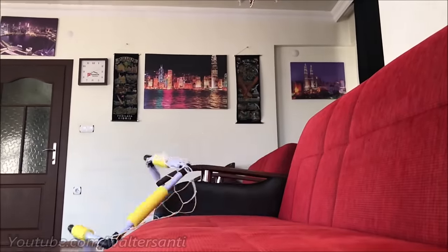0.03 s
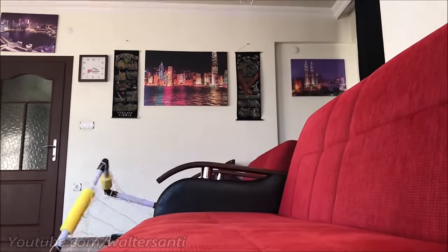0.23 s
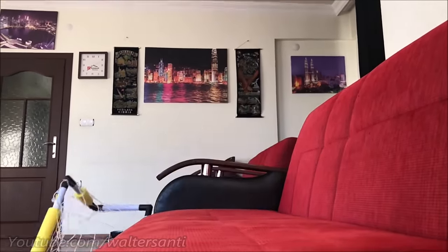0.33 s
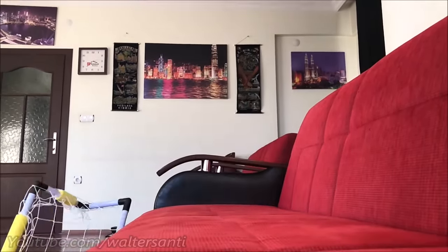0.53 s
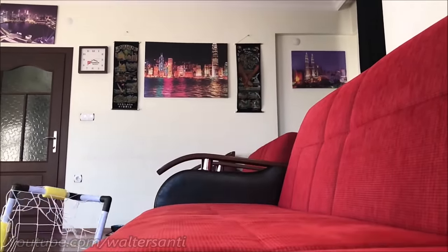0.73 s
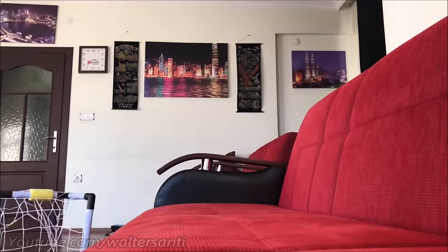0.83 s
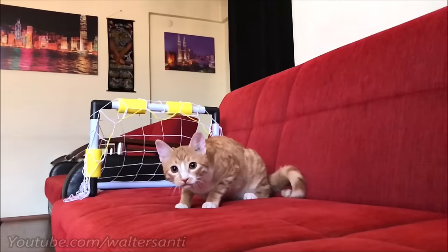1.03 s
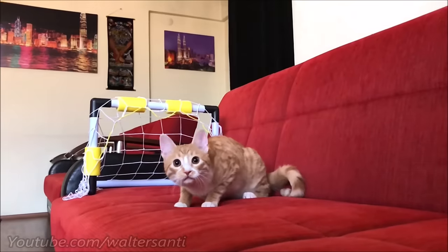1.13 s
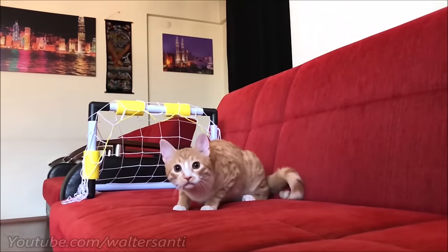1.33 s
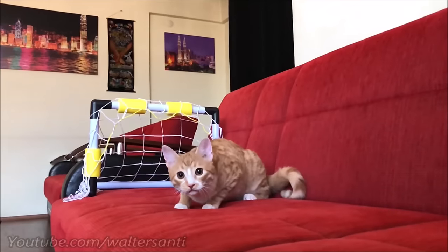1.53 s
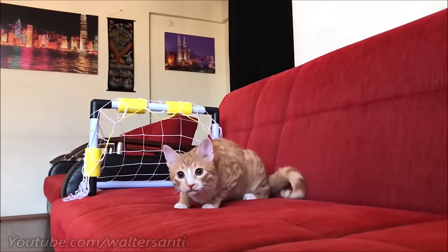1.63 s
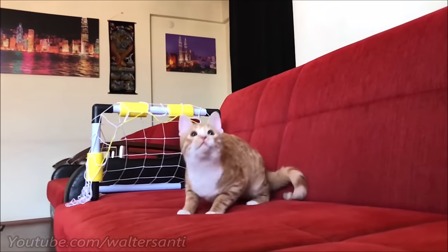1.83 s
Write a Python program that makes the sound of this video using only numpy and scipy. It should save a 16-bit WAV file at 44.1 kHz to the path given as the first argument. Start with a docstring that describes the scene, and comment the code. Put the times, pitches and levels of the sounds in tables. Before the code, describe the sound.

Loud hollow clatter of a light plastic toy tumbling off a sofa onto the floor.

```python
"""A toy goal of hollow plastic tubes tips off a sofa with soft bumps, hits the floor, bounces twice
and rattles to rest. The bare walls of a living room throw each blow back, and the loudest blows
clip. The sound cuts off just after one second; the quiet room fades in, with faint thin
whistles like distant birds and one tiny tick."""
import sys
import numpy as np
from scipy import signal
from scipy.fft import rfft, irfft
from scipy.io import wavfile
from scipy.ndimage import uniform_filter1d

SR = 44100
rng = np.random.default_rng(int(sys.argv[2]) if len(sys.argv) > 2 else 0)


def wrap_up_sound(samples):
    """Save the sound to the file named by the first command line argument, as 16-bit audio."""
    columns = np.atleast_2d(samples).T
    # keep every value between -1 and 1, then stretch to whole-number steps
    tamed = np.clip(columns, -1, 1)
    steps = np.round(tamed * 32767).astype(np.int16)
    wavfile.write(sys.argv[1], SR, steps)


N = 83790
SIZE = 2 ** 15  # samples per ring or room response

# spectrum of a light click (frequency [Hz], level [dB])
TICK_SPECTRUM = [(100, -29.5), (1500, -13), (3200, -13.5), (3900, 6), (6000, 0), (10000, -8.5),
                 (15000, -17)]


def floor_blows(treble_hz=3000, lag_at_1khz_s=0.0022):
    """Each blow, or bright slap just after the first, cracks, knocks and rings; lows trail highs."""
    # (time [s], level [dB], knock pitch [Hz], knock [dB], treble shelf [dB], direct path [dB])
    blows = [(0.2294, -6.5, 587, 3, -10, 6.5), (0.2400, -6, 622.4, -4.5, 9.5, 5),
             (0.262, -9.5, 630, -9.5, 5, -29), (0.4692, -8, 678, 6.5, -1, -0.5),
             (0.644, -14.5, 707, 2.5, 4, -2.5), (0.7522, -18, 699, 2.5, -3.5, -4.5),
             (0.812, -27, 570, -1.5, -6.5, -12)]
    # hard contact (frequency [Hz], level [dB])
    crack_spectrum = [(40, -34.5), (100, -24), (175, 3), (380, -7), (900, -1.5), (1450, 3.5), (2500, -7),
                      (4300, -8.5), (8000, -21.5), (15000, -29)]
    hz, out = freqs(), np.zeros(N)
    dispersion = np.exp(-4j * np.pi * lag_at_1khz_s * np.sqrt(1000 * hz))  # bending waves
    shelf = hz ** 2 / (hz ** 2 + treble_hz ** 2)
    for time_s, db, knock_hz, knock_db, treble_db, direct_db in blows:
        knock = undb(1 + knock_db) * tube_knock(knock_hz)
        ring = undb(-4.5) * frame_ring()
        crack = undb(3.5) * burst(crack_spectrum, t60_s=0.015)
        hit = colour(crack + knock + ring, treble_db * shelf)
        hit = irfft(rfft(hit, 2 * SIZE) * dispersion)[:SIZE]
        out += undb(db) * place(in_room(hit, direct_db), time_s)
    return out


def tube_knock(hz, rise_s=0.00051, t60_s=0.02):
    """Hollow knock with a soft onset, rising over about half a millisecond."""
    t = np.arange(SIZE) / SR
    swell = 1 - np.exp(-t / rise_s)
    return unit_energy(np.sin(2 * np.pi * hz * t) * swell * decay(t60_s))


def frame_ring(detune=0.017):
    """Damped modes; each contact detunes them and sets their signs at random."""
    # frame modes (frequency [Hz], level [dB], t60 [s])
    modes = [(528.7, -1.5, 0.51), (591, -0.5, 0.18), (644, -6.5, .2), (716.5, -1.5, 0.091), (877, -8, 0.11),
             (1134.3, -9, 0.086), (1352, -6, .18), (1442, -16, 0.25), (1695, -14, 0.09),
             (1962, -15.5, 0.16), (2630, -21, .1), (3050, -20, .08), (3880, -18.5, .08)]
    t, ring = np.arange(SIZE) / SR, np.zeros(SIZE)
    for hz, db, t60_s in modes:
        shift, side = rng.standard_normal(2)
        tone = np.sin(2 * np.pi * hz * (1 + detune * shift) * t)
        ring += np.sign(side) * undb(db) * unit_energy(tone * decay(t60_s))
    return ring


def sofa_bumps():
    """Soft thuds against the upholstery."""
    # (time [s], level [dB])
    bumps = [(0.001, -17.5), (0.112, -24.5), (0.86, -18), (1.021, -26), (1.050, -23.5)]
    # soft contact (frequency [Hz], level [dB])
    thud_spectrum = [(40, -7.5), (120, -12), (250, -10.5), (450, -0.5), (650, -5), (1000, -23),
                     (2000, -28.5), (5000, -35.5), (15000, -60)]
    return sum(undb(db) * place(burst(thud_spectrum, t60_s=0.053), time_s) for time_s, db in bumps)


def joint_clicks():
    """Light clicks of the frame's joints."""
    # (time [s], level [dB])
    clicks = [(0.003, -41.5), (0.1311, -27), (0.1536, -35), (0.4887, -18), (0.6631, -24), (0.773, -33),
              (0.831, -36.5), (1.0513, -57.5), (1.0654, -45.5)]
    return sum(undb(db) * place(burst(TICK_SPECTRUM, t60_s=0.017), time_s) for time_s, db in clicks)


def in_room(x, direct_db):
    """Direct path, wall reflections smeared by furniture, diffuse tail."""
    # first reflections (delay [s], level [dB])
    echoes = [(0.01, -6), (.0148, -9), (0.0191, -5.5), (0.028, -7)]
    response = np.zeros(SIZE)
    response[0] = undb(direct_db)
    for delay_s, db in echoes:
        smear = unit_energy(rng.standard_normal(SIZE) * decay(t60_s=0.012))
        response += undb(db) * place(smear, delay_s, size=SIZE)
    return convolve(x, response + undb(2.5) * room_tail())


def room_tail(delay_s=0.004, build_s=0.0084):
    """Diffuse reverberation that builds quickly and loses its treble first."""
    # room decay (frequency [Hz], t60 [s])
    bands = [(100, 0.54), (300, 1), (700, 0.47), (1500, 0.55), (4000, 0.53), (8000, 0.39), (15000, 0.25)]
    centres_hz, t60s = np.array(bands).T
    spectrum, hz = rfft(rng.standard_normal(SIZE)), freqs(SIZE // 2)
    tail = np.zeros(SIZE)
    for t60_s, weights in zip(t60s, np.eye(len(bands))):
        band_gain = log_interp(list(zip(centres_hz, weights)), hz)
        tail += irfft(spectrum * band_gain) * decay(t60_s)
    build = 1 - np.exp(-np.arange(SIZE) / SR / build_s)
    return unit_energy(place(tail * build, delay_s, size=SIZE))


def whistles(tail, arch=0.053, waver_depth=0.014, wet_db=-3):
    """Faint arched, wavering whistles that linger in the room."""
    # (time [s], length [s], top pitch [Hz], level [dB])
    notes = [(1.395, .04, 8200, -61), (1.426, 0.047, 7000, -59.5), (1.555, 0.064, 6370, -53),
             (1.644, 0.067, 6780, -61), (1.705, 0.034, 6180, -53.5)]
    t, out = np.arange(N) / SR, np.zeros(N)
    waver = uniform_filter1d(rng.standard_normal(N), size=100)
    waver /= np.std(waver)
    for time_s, length_s, top_hz, db in notes:
        position = np.clip(2 * (t - time_s) / length_s - 1, -1, 1)
        pitch_hz = top_hz * (1 - arch * position ** 2 + waver_depth * waver)
        out += undb(db) * (1 - position ** 2) * np.sin(2 * np.pi * np.cumsum(pitch_hz) / SR)
    return out + undb(wet_db) * convolve(out, tail)


def lone_tick(tail):
    """One tiny tick and its reverberation."""
    tick = undb(-26.5) * place(burst(TICK_SPECTRUM, t60_s=0.053), time_s=1.806)
    return tick + convolve(tick, tail)


def room_noise(rms_db=-35.5):
    """Low steady background noise."""
    # (frequency [Hz], relative density [dB])
    noise_spectrum = [(15, -55), (25, -27.5), (49, -1.5), (90, -9.5), (115, 1.5), (154, -4), (231, -1),
                      (286, -8), (373, -10.5), (488, -14), (1000, -12), (2930, -30.5), (6370, -46.5),
                      (8550, -47.5), (15000, -52.5)]
    noise = colour(rng.standard_normal(N), log_interp(noise_spectrum, freqs(N)))
    return undb(rms_db) * noise / np.std(noise)


def burst(spectrum, t60_s):
    """Short contact: coloured, fast-decaying noise."""
    noise = rng.standard_normal(SIZE) * decay(t60_s)
    return unit_energy(colour(noise, log_interp(spectrum, freqs())))


def colour(x, gain_db):
    """Minimum-phase filter, one gain per bin."""
    n, cepstrum = len(x), irfft(np.log(undb(gain_db)))
    cepstrum[1:n] *= 2
    cepstrum[n + 1:] = 0
    return irfft(rfft(x, 2 * n) * np.exp(rfft(cepstrum)))[:n]


def log_interp(points, hz):
    """Interpolate (Hz, value) points over log frequency."""
    points_hz, values = np.array(points).T
    return np.interp(np.log(hz + 1e-9), np.log(points_hz), values)


def freqs(size=SIZE):
    """Bin frequencies [Hz] of an FFT of 2 * size samples."""
    return np.arange(size + 1) * SR / (2 * size)


def place(x, time_s, size=N):
    """Start x at time_s in silence."""
    return np.concatenate([np.zeros(int(time_s * SR)), x, np.zeros(size)])[:size]


def decay(t60_s):
    return np.exp(-np.log(1000) * np.arange(SIZE) / SR / t60_s)


def convolve(x, response):
    return signal.fftconvolve(x, response)[:N]


def unit_energy(x):
    return x / np.sqrt(np.sum(x ** 2))


def undb(db):
    return 10 ** (np.asarray(db) / 20)


def scene(toy_db=22, cut_s=1.085, fade_out_s=0.003, fade_in_s=0.12):
    """The fall, cut short; then the quiet room fades in."""
    t, tail, noise = np.arange(N) / SR, room_tail(), room_noise()
    tick, bumps, clicks = lone_tick(tail), sofa_bumps(), joint_clicks()
    toy = floor_blows() + in_room(bumps, direct_db=2) + in_room(clicks, direct_db=-0.5)
    fall = undb(toy_db) * toy + noise
    quiet = noise + whistles(tail) + tick
    fall_gain = np.clip((cut_s - t) / fade_out_s, 0, 1)
    quiet_gain = np.clip((t - cut_s) / fade_in_s, 0.1, 1)
    return (fall * fall_gain + quiet * quiet_gain)[None]


def record(dry, knee=15, low_cut_hz=30, high_cut_hz=15900):
    """The loud blows clip at full scale; deep bass and top treble are cut."""
    clipped = dry / (1 + np.abs(dry) ** knee) ** (1 / knee)
    highpass = signal.butter(2, low_cut_hz, "high", fs=SR, output="sos")
    lowpass = signal.ellip(8, 0.2, 70, high_cut_hz, fs=SR, output="sos")
    return signal.sosfilt(lowpass, signal.sosfilt(highpass, clipped))


dry = scene()
out = record(dry)
wrap_up_sound(out)
```